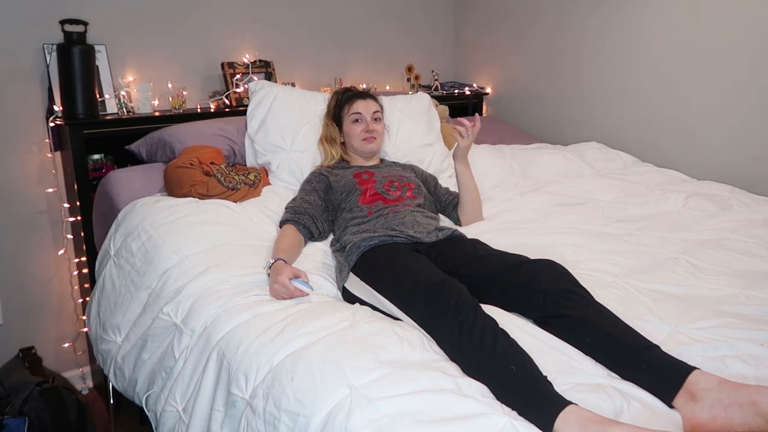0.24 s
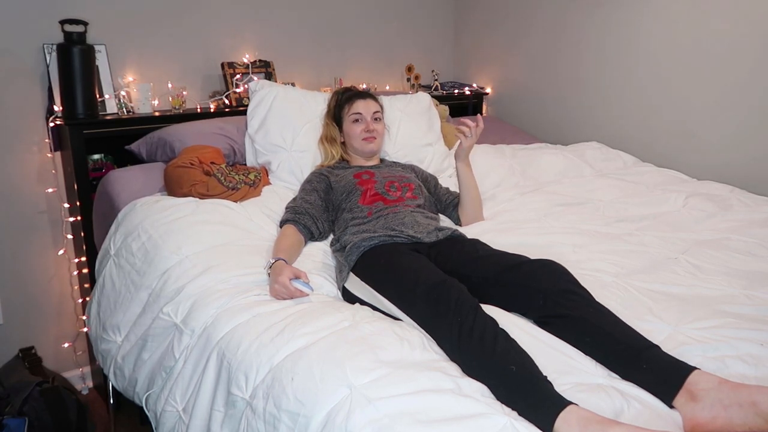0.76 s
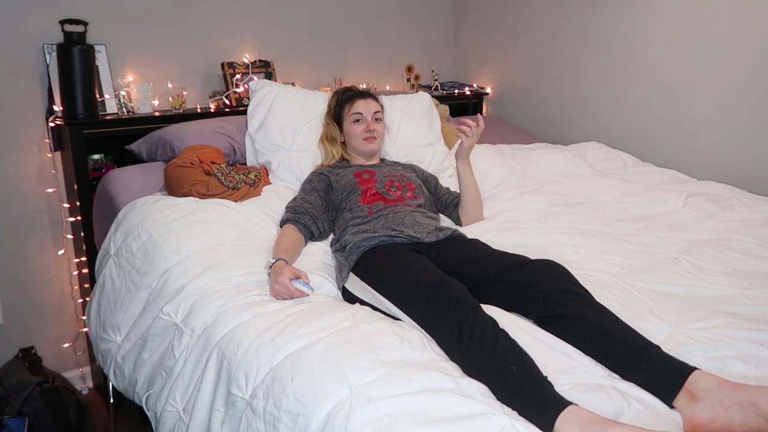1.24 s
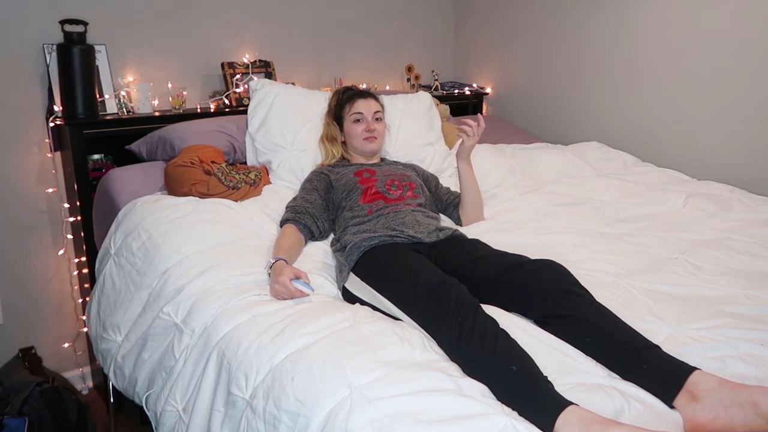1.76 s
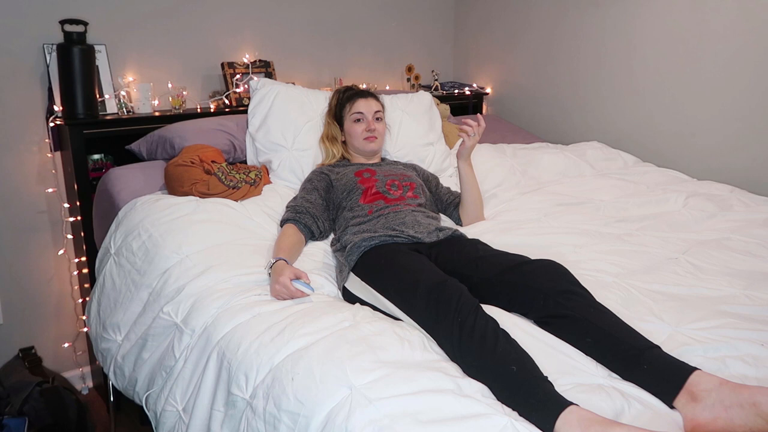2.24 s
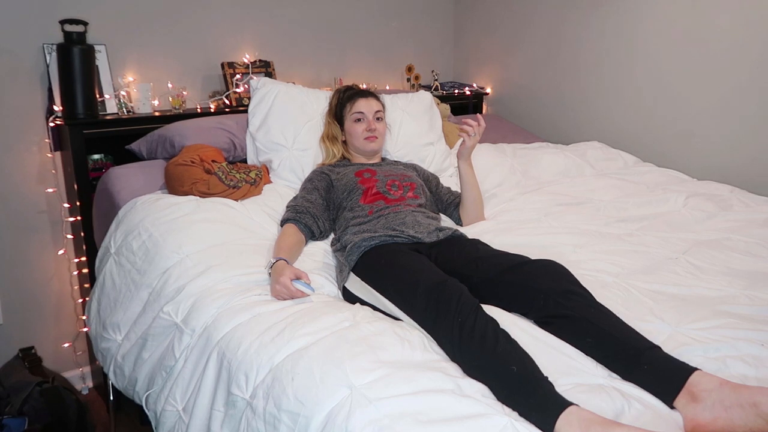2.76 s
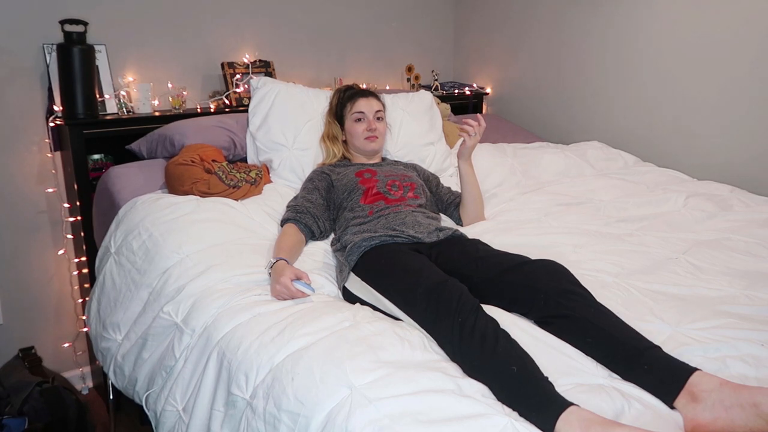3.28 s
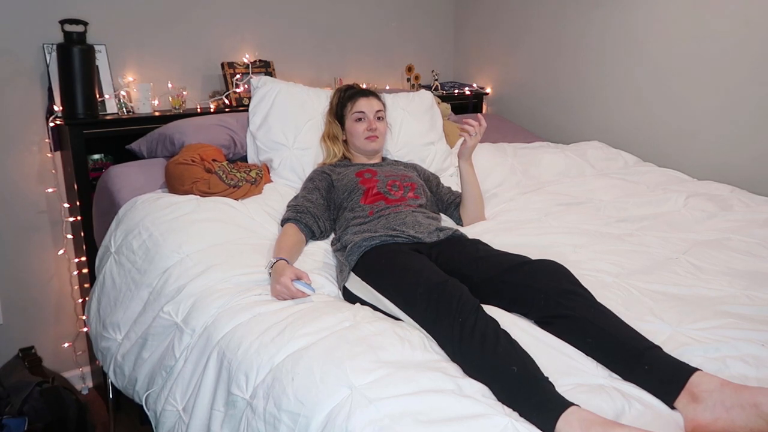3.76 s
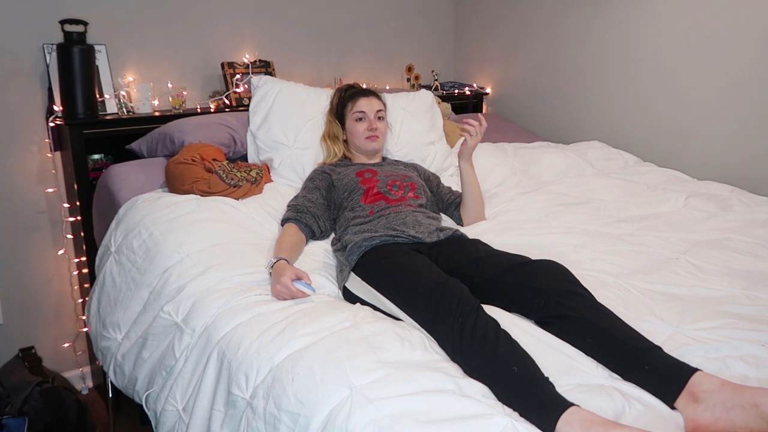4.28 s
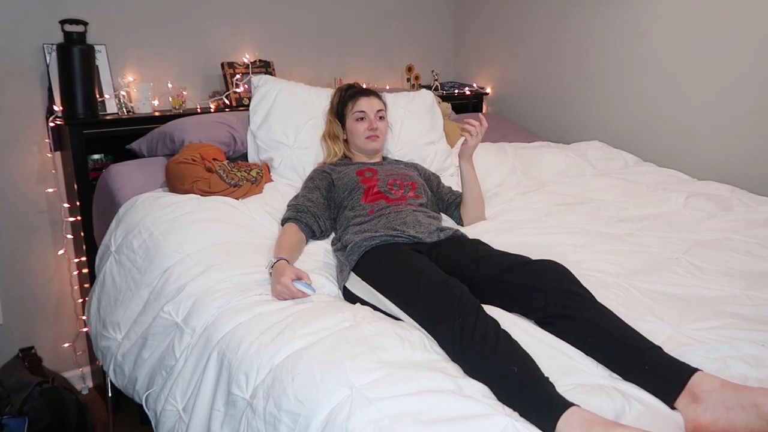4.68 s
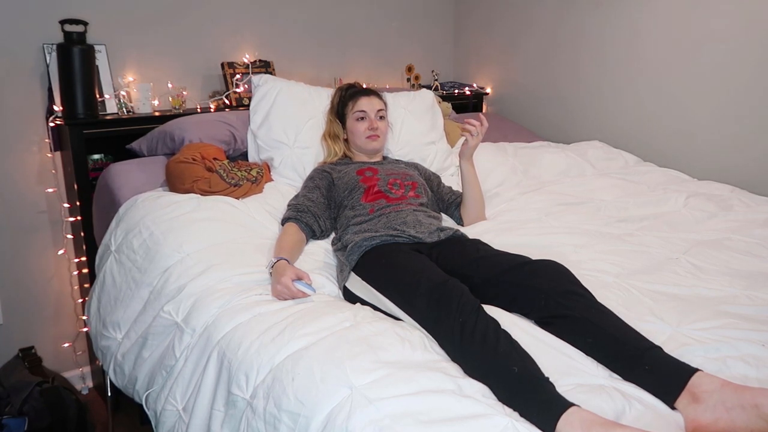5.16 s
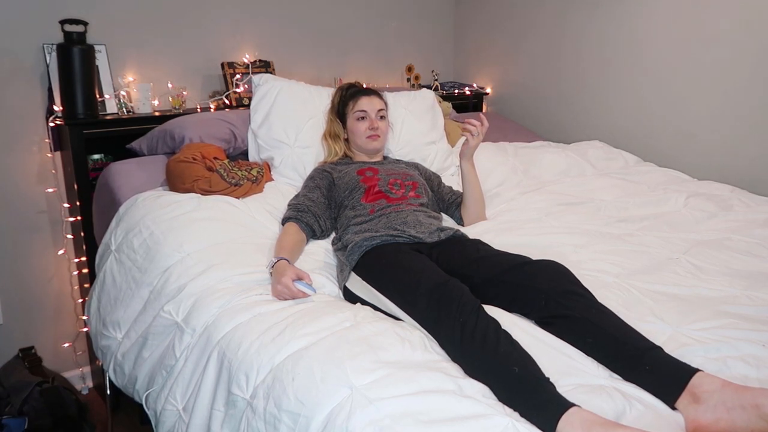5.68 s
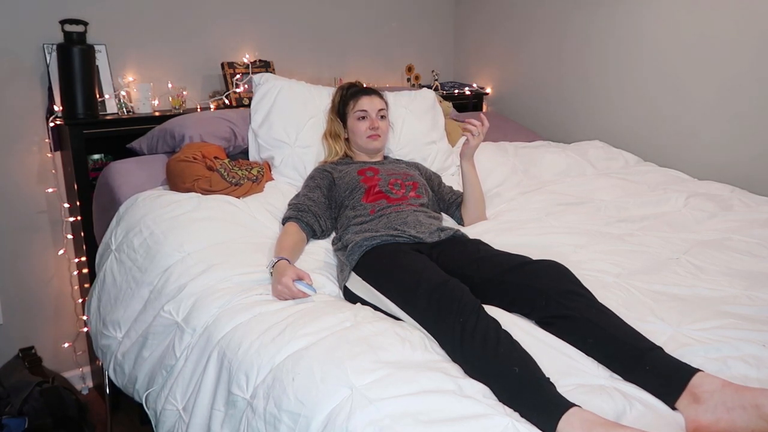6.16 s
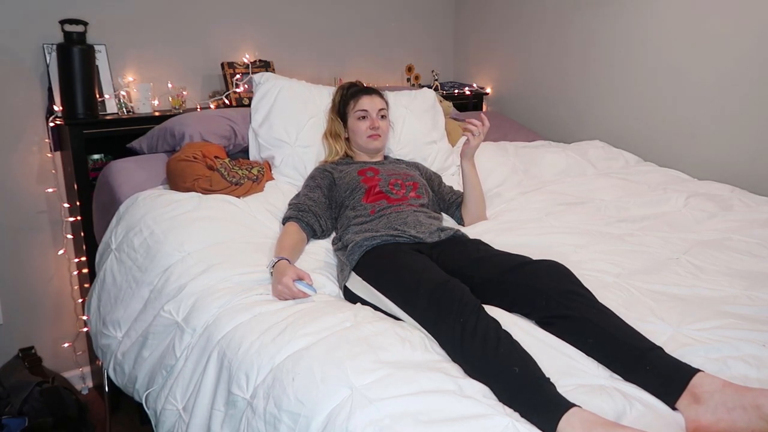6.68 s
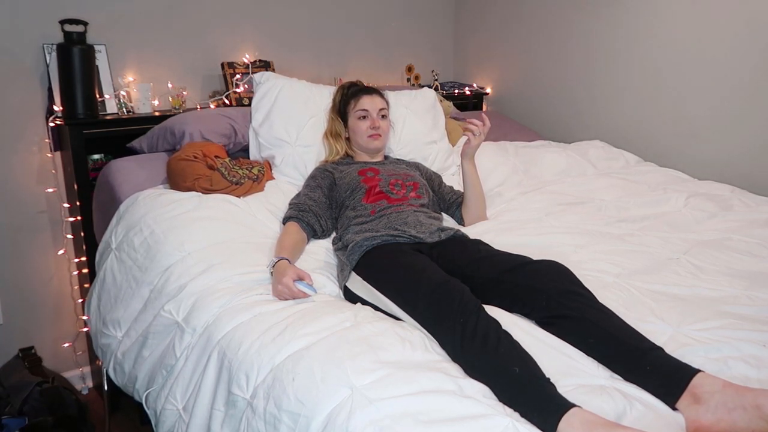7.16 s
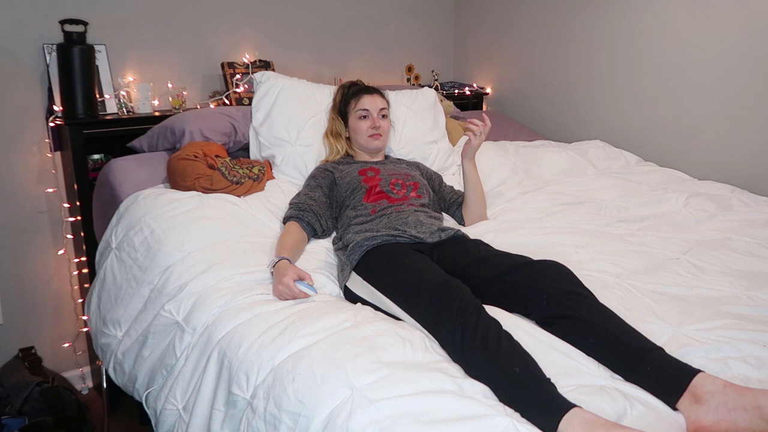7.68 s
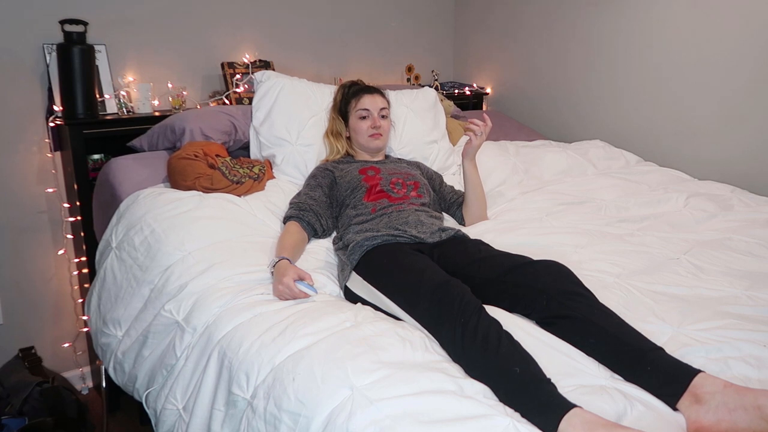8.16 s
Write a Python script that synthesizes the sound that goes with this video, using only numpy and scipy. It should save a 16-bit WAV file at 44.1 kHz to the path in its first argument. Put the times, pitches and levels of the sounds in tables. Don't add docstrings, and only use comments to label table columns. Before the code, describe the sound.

Loud even motor hum of a mains blower inflating a cushion on a bed, whining and hissing close by, after one soft bedding thud.

```python
import sys
import numpy as np
from scipy import signal
from scipy.fft import rfft, irfft, next_fast_len
from scipy.io import wavfile
from scipy.ndimage import uniform_filter1d

SR = 44100
rng = np.random.default_rng(int(sys.argv[2]) if len(sys.argv) > 2 else 0)


def makeup_ratio(level_db):
    decades = np.asarray(level_db, float) / 20
    return 10 ** decades


def put_to_file(sound):
    columns = np.atleast_2d(sound).T
    safe = np.clip(columns, -1, 1)
    whole_steps = np.round(safe * 32767)
    wavfile.write(sys.argv[1], SR, whole_steps.astype(np.int16))


N = 371322

# f/Hz, density/(dB per Hz)
RUMBLE = [(20, -98), (45, -78), (70, -78), (95, -72.5), (125, -76.5), (170, -79.5), (200, -71.5),
          (260, -101)]
# t/s, f/Hz, level/dB, length/s
THUDS = [
    (.085, 200, -38, 0.04),
    (4.94, 55, -45, .02),
]

# t/s, level/dB
SWELL = [(0, -5), (.2, -3.5), (.45, -2), (.75, 0.3), (1.1, 0.07), (8.42, -0.1)]
# f/Hz, in-step share, quarter-turn share
PORTS = [(100, .15, 0), (500, .35, 0), (750, .05, -.5), (1000, .45, 0.36), (2000, .3, 0.44),
         (3000, 0.25, .4), (4500, 0.16, .5), (5200, 0.026, .05), (6200, 0.11, .45), (8000, .03, .2),
         (11000, 0.014, .03)]

# f/Hz, density/(dB per Hz)
AIR_MID = [(150, -89.5), (260, -62.5), (420, -70.5), (700, -66.5), (1100, -60.5), (1600, -62.5),
           (2300, -62), (3000, -65), (4000, -71.5), (5500, -81), (7000, -86.5), (8300, -94.5),
           (10500, -97.5), (13000, -108)]
AIR_SIDE = [(40, -132), (170, -96), (300, -90), (480, -89), (750, -84.5), (1100, -76.5), (1600, -72.5),
            (2300, -76.5), (3300, -71), (4500, -76), (6000, -80), (8000, -86), (11000, -90.5),
            (15000, -103)]
# f/Hz, width/Hz, level/dB
MID_MODES = [(199, 15.3, 11), (224, 11, -16), (354, 14.7, 12), (399, 37, -9), (455.4, 15.4, 7.5),
             (524, 47, 7), (657, 14, 0.5), (773, 27, 6.5), (910, 16, -1), (980, 49, -4.5),
             (1031, 15, -11.5), (1268, 45, 3), (1328, 13, -12), (1356, 20, 5.5), (1446, 21, 10.5),
             (1523, 14, 7.5), (1833, 52, -10), (1940, 35, -4), (2066, 14, 8), (2077, 33, -8.5),
             (2759, 65, 14), (2886, 32, 5), (3060, 54, -3.5), (3220, 26, -4), (3886, 25, 6.5),
             (4040, 47, -17), (5850, 38, 5), (5870, 31, 6), (6070, 63, 9.5)]
SIDE_MODES = [(375, 80, 13), (750, 70, 10.5), (866, 53, 1), (959, 37, -6), (1899, 42, 5), (2860, 91, 6),
              (3198, 80, -3), (3867, 75, 10), (6040, 90, 6)]

# t/s, speed above idle/(turns per s)
SPEED = [(0.1, .62), (.7, -.14), (1.26, .49), (1.48, .05), (2, .17), (2.24, .48), (2.84, .82), (3.64, .88),
         (4.03, 1.42), (4.26, 1.1), (4.5, 1.35), (5.04, 1.22), (5.22, .94), (5.52, 1.3), (5.76, 1.17),
         (6.84, 1.91), (7.9, 1.99), (8.2, 2.2)]
# multiple, mid level/dB, side level/dB
TONES = [(1, -28, -51), (2, -40, -54), (3, -46, -60), (4, -27, -50), (5, -34, -42), (6, -37, -64),
         (7, -37, -56), (8, -46, -51), (9, -41, -46), (10, -45, -55), (11, -54, -54), (12, -58, -62),
         (13, -58, -56), (14, -70, -55), (15, -63, -66), (16, -41, -40), (17, -64, -60), (18, -73, -72),
         (19, -77, -72), (20, -72, -61), (21, -83, -69), (22, -85, -74), (30, -79, -70), (32, -82, -64),
         (40, -110, -78)]
# multiple, lower mid level/dB, lower side level/dB, upper mid level/dB, upper side level/dB
FLANKS = [(1, -51, -86, -62, -89), (2, -55, -79, -51, -75), (3, -56, -74, -55, -65),
          (4, -60, -76, -46, -68), (5, -47, -59, -48, -66), (6, -55, -68, -57, -75),
          (7, -56, -74, -41.5, -55), (8, -53, -62, -42, -56), (9, -55, -64, -48, -56),
          (10, -56, -60, -54, -51), (11, -63, -67, -61, -62), (12, -65, -59, -63, -63),
          (13, -59, -61, -62, -63), (15, -69, -65, -68, -74), (16, -66, -61, -71, -68),
          (20, -75, -70, -84, -78), (21, -86, -71, -86, -86)]

STRONG_MULTIPLES = (1, 4, 5, 9)
ROOM_STRONG = [(-.1, -30, -27, -33.4, -41), (.15, -29.5, -26, -33.5, -43), (.5, -29, -25, -33, -39.5),
               (.85, -28, -25, -31, -40.3), (1.3, -27.5, -26, -33.5, -39.5),
               (1.55, -27.1, -28.1, -37, -37.5), (1.75, -27.5, -30.5, -47, -40),
               (2.0, -26.6, -35, -50, -40), (2.2, -26.5, -36, -46, -44)]
MID_MULTIPLES = (3, 6, 7, 8)
ROOM_MIDDLE = [(-.1, -39, -34, -35, -40), (.15, -44, -34.5, -36.5, -51), (.5, -48, -38, -39.5, -48),
               (.85, -51, -36.5, -38.5, -42.5), (1.3, -45, -38, -36.5, -49.5), (1.6, -42, -38, -35, -44),
               (1.9, -43, -36.5, -34.5, -47), (2.15, -40, -38, -41, -49)]
# speed above idle/(turns per s), then 10th, whine mid, whine side, whine octave level/dB
ROOM_HIGH = [(-.1, -60, -59, -34.2, -86), (0.0, -58, -46, -35.6, -86), (.13, -59, -33, -35, -84),
             (.45, -44, -45.5, -37.5, -82), (.7, -41.8, -40, -37, -85), (.86, -40.5, -40.5, -46, -81),
             (.95, -45, -45, -53, -79), (1.15, -42, -41.5, -42.8, -78), (1.26, -43, -49, -42.7, -78),
             (1.4, -46, -60, -42.6, -78), (1.55, -46.5, -51, -39.8, -80), (1.8, -58, -53, -46.9, -84),
             (1.91, -54, -40, -43.5, -83), (2.05, -53, -37, -43, -79), (2.2, -50, -34, -55, -73)]
# speed above idle/(turns per s), change/dB
FLANK_8TH = [(.5, -10), (.85, -2), (1.3, 1.5), (1.9, 2.5), (2.15, -5)]
# speed above idle/(turns per s), phase/rad
LEAD_4TH = [(1.45, -2.4), (1.75, .5)]

RIPPLE_HZ, BARS = 120, 16
IDLE_TURNS, HUNT_TURNS = 376, .02
ROOM_LAG_S = .02
EVEN_FROM_S, EVEN_TO_S, EVEN_EDGE_S, EVEN_DB = 3.75, 4.9, .1, -19
SIDE_FOLLOWS = 0.36


def in_time(rows):
    s, *columns = np.transpose(rows)
    return [np.interp(np.arange(N) / SR, s, c) for c in columns]


def at_hz(points, hz):
    knots, *columns = np.transpose(points)
    return [np.interp(np.log(hz + 1), np.log(knots), c) for c in columns]


def at_speed(rows, speed):
    knots, *columns = np.transpose(rows)
    return [np.interp(speed, knots, c) for c in columns]


def drift(rate):
    r = np.exp(-128 * np.pi * rate / SR)
    chance = rng.standard_normal(N // 64 + 1002)
    slow = signal.lfilter([1], [1, -2 * r, r * r], chance)[1000:]
    return np.repeat(slow / slow.std(), 64)[:N]


def fading(share, rate):
    share = np.clip(share, 0, 1)
    reflections = drift(rate) + 1j * drift(rate)
    return np.sqrt(1 - share) + np.sqrt(share / 2) * reflections


def house():
    t, hz = np.arange(N) / SR, np.fft.rfftfreq(N, 1 / SR)
    level = makeup_ratio(at_hz(RUMBLE, hz)[0]) * (hz < 400)
    sound = irfft(rfft(np.sqrt(SR / 2) * rng.standard_normal(N)) * level, N)
    for s, thud_hz, db, length in THUDS:
        bump = np.exp(-((t - s) / length) ** 2)
        sound += makeup_ratio(db) * bump * np.sin(2 * np.pi * thud_hz * (t - s))
    return sound


def colour(hz, spectrum, modes, echo_db):
    level_db = at_hz(spectrum, hz)[0]
    for centre, width, db in modes:
        level_db = level_db + db / (1 + (2 * (hz - centre) / width) ** 2)
    lags = rng.uniform(.003, .03, size=10)
    echoes = sum(makeup_ratio(echo_db) * np.exp(-2j * np.pi * hz * lag) for lag in lags)
    return makeup_ratio(level_db) * (1 + echoes * hz / (hz + 2500))


def air(gain):
    size = next_fast_len(N)
    hz = np.fft.rfftfreq(size, 1 / SR)
    pulse = 1 + .008 * np.cos(2 * np.pi * RIPPLE_HZ * np.arange(size) / SR)
    common, own = rfft(np.sqrt(SR / 2) * pulse * rng.standard_normal((2, size)))
    in_step, quarter = at_hz(PORTS, hz)
    apart = np.sqrt(np.clip(1 - in_step ** 2 - quarter ** 2, 0, 1))
    mid = common * colour(hz, AIR_MID, MID_MODES, echo_db=-18)
    side = (in_step + 1j * quarter) * common + apart * own
    side = side * colour(hz, AIR_SIDE, SIDE_MODES, echo_db=-21)
    flutter = makeup_ratio(.3 * drift(2.4))
    return gain * flutter * irfft(np.array([mid, side]), size)[:, :N]


def motor(gain):
    t = np.arange(N) / SR
    climb = uniform_filter1d(in_time(SPEED)[0], size=SR // 10, mode="nearest")
    speed = climb + HUNT_TURNS * drift(3)
    turns = np.cumsum(IDLE_TURNS + speed + .04 * drift(14)) / SR
    heard = np.interp(t - ROOM_LAG_S, t, speed)
    ripple = np.exp(2j * np.pi * RIPPLE_HZ * t)

    played = dict(zip(STRONG_MULTIPLES, at_speed(ROOM_STRONG, heard)))
    played.update(zip(MID_MULTIPLES, at_speed(ROOM_MIDDLE, heard)))
    played[10], whine_mid_db, whine_side_db, octave_db = at_speed(ROOM_HIGH, heard)
    even_on = np.tanh((t - EVEN_FROM_S) / EVEN_EDGE_S)
    even_off = np.tanh((t - EVEN_TO_S) / (2 * EVEN_EDGE_S))
    even = (even_on - even_off) / 2
    flanks = {k: levels_db for k, *levels_db in FLANKS}

    mid, side = np.zeros(N), np.zeros(N)
    for k, mid_db, side_db in TONES:
        carrier = gain * np.sqrt(2) * np.exp(2j * np.pi * (k * turns + rng.random()))
        in_step, quarter = at_hz(PORTS, k * IDLE_TURNS)
        lead = np.exp(1j * np.arctan2(quarter, in_step))
        if k == 4:
            lead = np.exp(1j * at_speed(LEAD_4TH, heard)[0])
        if k == BARS:
            tone_mid = makeup_ratio(whine_mid_db)
            tone_side = makeup_ratio(whine_side_db + EVEN_DB * even)
        elif k == 2 * BARS:
            tone_mid = makeup_ratio(octave_db + 5)
            tone_side = makeup_ratio(side_db) * fading(.15, 1.1)
        elif k in played:
            swing_db = played[k] - mid_db
            tone_mid = makeup_ratio(played[k])
            tone_side = makeup_ratio(side_db + SIDE_FOLLOWS * swing_db) * fading(0.035, 0.6)
        else:
            tone_mid = makeup_ratio(mid_db) * fading(.05, .9)
            tone_side = makeup_ratio(side_db) * fading(.25, .9)
        if k in flanks:
            low_mid, low_side, up_mid, up_side = makeup_ratio(np.array(flanks[k]))
            below = fading(.2, 1.5) / ripple * np.exp(2j * np.pi * rng.random())
            above = fading(.08, 1.5) * ripple * np.exp(2j * np.pi * rng.random())
            if k == 8:
                above = above * makeup_ratio(at_speed(FLANK_8TH, heard)[0])
            tone_mid = tone_mid + low_mid * below + up_mid * above
            tone_side = tone_side + low_side * below + up_side * above
        mid += (carrier * tone_mid).real
        side += (carrier * lead * tone_side).real
    return np.array([mid, side])


def scene():
    gain = makeup_ratio(in_time(SWELL)[0])
    mid, side = motor(gain) + air(gain)
    return np.array([mid + side, mid - side]) + house()


def low_pass(x):
    return signal.sosfilt(signal.butter(12, 15150, fs=SR, output="sos"), x)


def record(dry):
    return low_pass(dry)


dry = scene()
out = record(dry)
put_to_file(out)
```